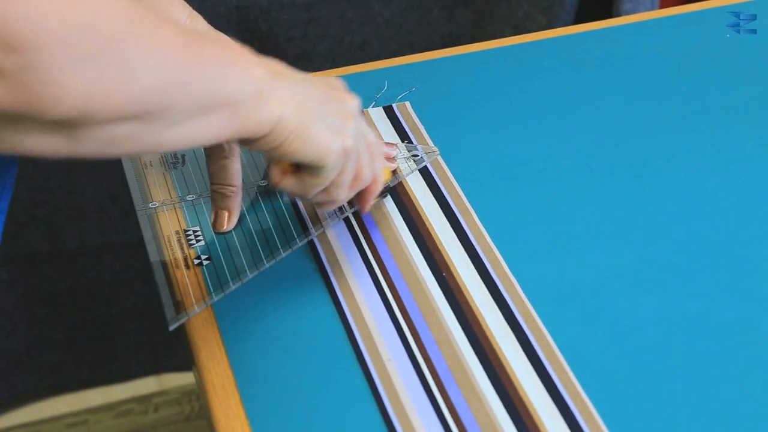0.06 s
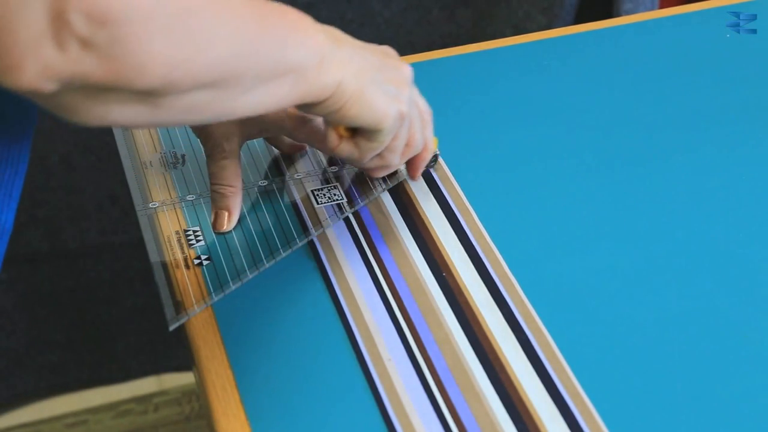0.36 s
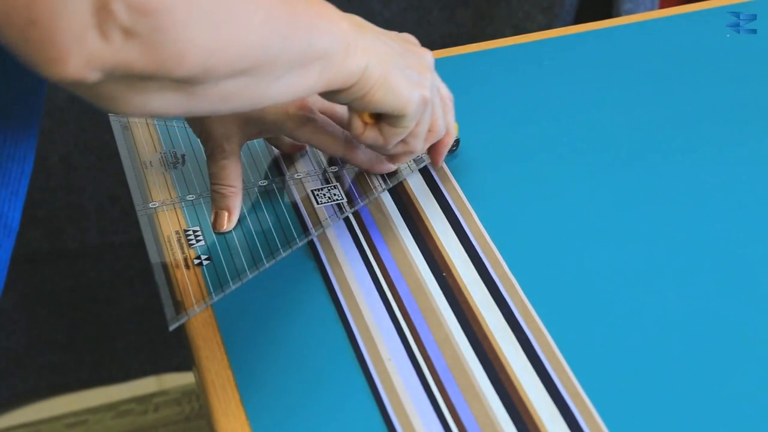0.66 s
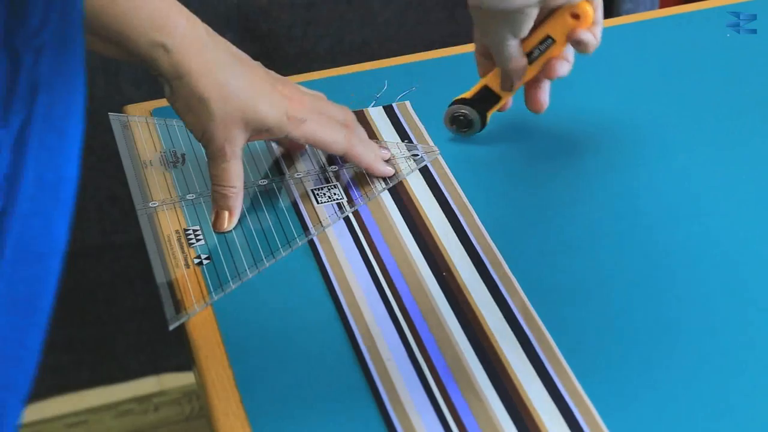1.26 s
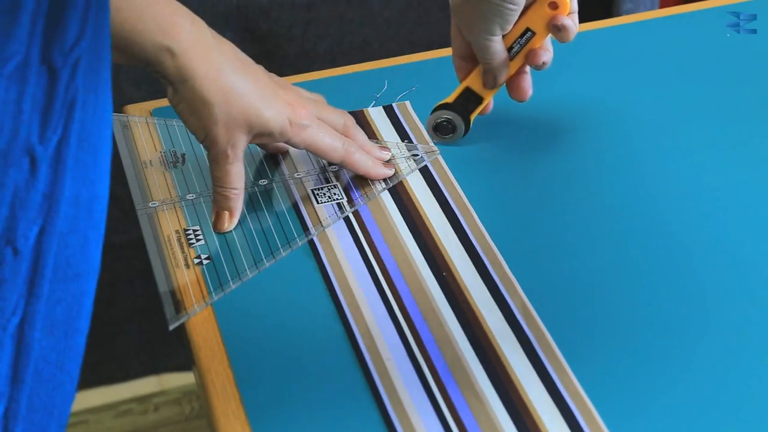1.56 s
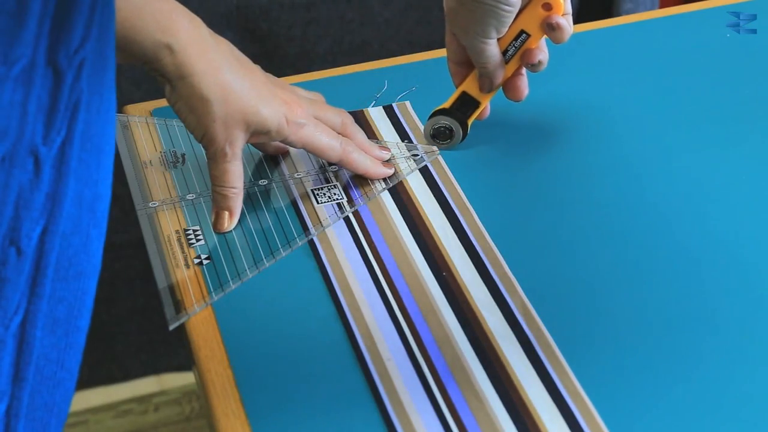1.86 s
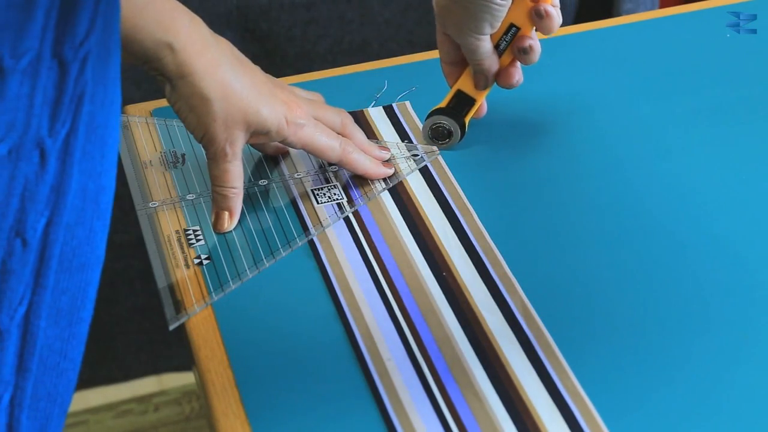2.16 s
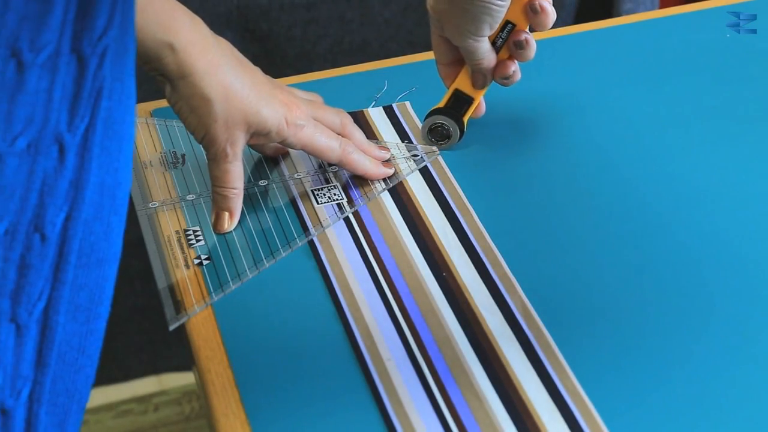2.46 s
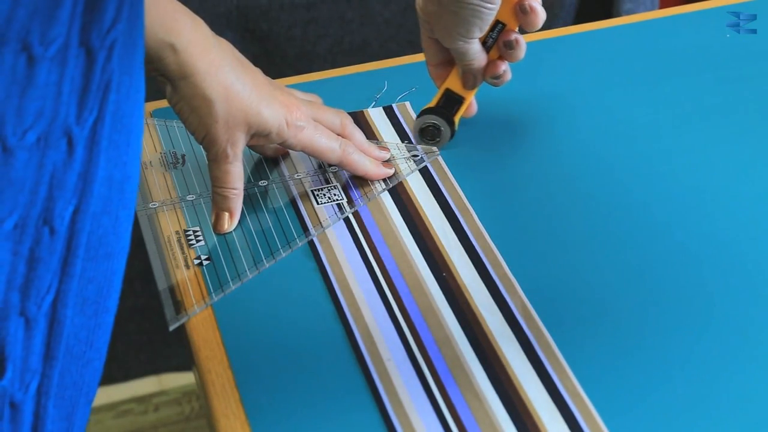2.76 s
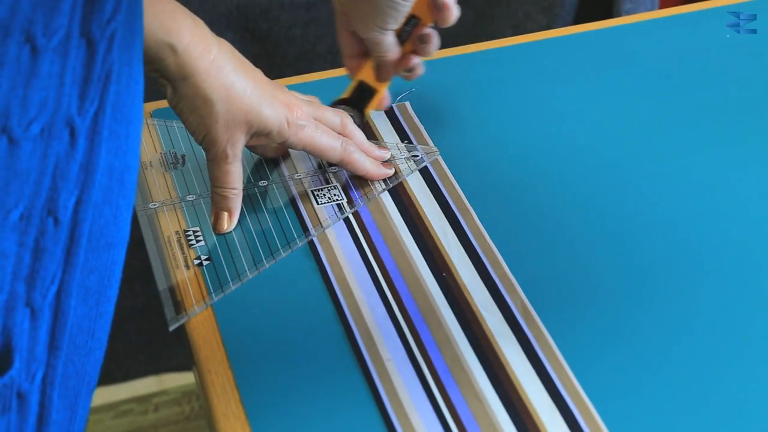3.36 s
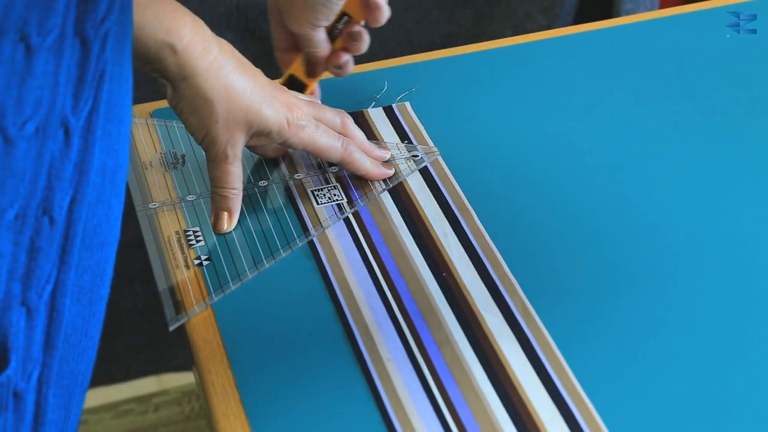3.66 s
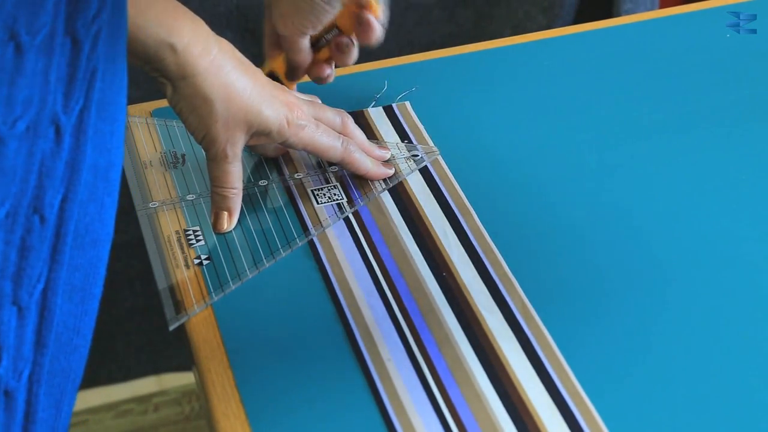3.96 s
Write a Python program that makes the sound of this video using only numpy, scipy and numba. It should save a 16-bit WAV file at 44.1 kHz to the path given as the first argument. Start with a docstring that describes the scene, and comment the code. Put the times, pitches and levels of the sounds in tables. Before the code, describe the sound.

A rotary cutter rasps briefly through folded fabric on a mat. After a soft rustle, a tap and a few clicks, it makes a longer cut with cracking threads and low table thrums, close up in a small quiet room.

```python
"""A rotary cutter rolls along a ruler, through folded fabric on a cutting mat, in a small quiet room.
Its wheel judders, snaps threads and rasps on the mat, ringing the blade, the ruler and the table top.
An arm swings back with a soft rustle, a finger taps the ruler, and the cutter clicks as it is lined up.
Then the wheel bites with a squeak and makes a second, longer stroke: the table thrums under the
leaning arm and thick threads crack. Faint hiss and a deep rumble lie under it all."""
import sys
import numpy as np
from scipy import signal
from scipy.fft import rfft, irfft
from scipy.io import wavfile
from numba import njit

SR = 44100
rng = np.random.default_rng(int(sys.argv[2]) if len(sys.argv) > 2 else 0)


def transcribe(signal):
    """Save signal, clipped to [-1, 1], as a 16-bit WAV file at the path in sys.argv[1]."""
    frames = np.atleast_2d(signal).T
    limited = np.clip(frames, -1, 1)
    pcm = np.round(limited * 32767).astype(np.int16)
    wavfile.write(sys.argv[1], SR, pcm)


N = 176400
TIME = np.arange(N) / SR
THREADS_PER_S, GRIT_PER_S = 5000, 9000


def undb(db):
    """Decibels to gain."""
    return 10 ** (np.asarray(db) / 20)


def unit(x):
    """Scale to rms 1."""
    return x / np.sqrt(np.mean(x ** 2))


def control(rows, column=1):
    """One column of a timed table at every sample."""
    rows = np.array(rows)
    return np.interp(TIME, rows[:, 0], rows[:, column])


def fader(rows):
    """Gain along (t/s, level/dB) points; silent outside them."""
    return undb(np.interp(TIME, *np.array(rows).T, left=-120, right=-120))


def wander(per_s):
    """Slow random motion with a spread near 1."""
    return np.interp(TIME * per_s, np.arange(1000), rng.standard_normal(1000))


def grains(per_s):
    """Dense clicks of either sign, a few up to 5 dB above the rest."""
    impulses = (rng.random(N) < per_s / SR) * rng.choice([-1, 1], N)
    return impulses * undb(np.minimum(rng.exponential(size=N), 5))


def colour(x, points):
    """Minimum-phase EQ through (f/Hz, level/dB) points, at rms 1."""
    hz, db = np.array(points, float).T
    gain = undb(np.interp(np.log(np.arange(N // 2 + 1) * SR / N + 1e-3), np.log(hz), db))
    cepstrum = irfft(np.log(gain), N)
    cepstrum[1:N // 2] *= 2
    cepstrum[N // 2 + 1:] = 0
    return unit(irfft(rfft(x) * np.exp(rfft(cepstrum)), N))


@njit
def resonance(x, hz, k):
    """State-variable band-pass with a moving centre; k is width over centre."""
    y, state, low = np.empty(len(x)), 0., 0.
    for i in range(len(x)):
        g = np.tan(np.pi * min(hz[i] / SR, .45))
        v = (state + g * (x[i] + 1e-18 - low)) / (1 + g * (g + k))
        state, low, y[i] = 2 * v - state, low + 2 * g * v, k * v
    return y


def band(x, hz, width, shift=1):
    """One resonance, gain 1 at hz times shift."""
    return resonance(x, np.ones(N) * hz * shift, float(width / hz))


def ring(x, modes, shift=1):
    """Steep-sided modes driven by x, in alternating polarity, at rms 1."""
    body = 0
    for k, (hz, width, db) in enumerate(modes):
        broad = 1.62 * width  # two passes narrow it again
        body += (-1) ** k * undb(db) * band(band(x, hz, broad, shift), hz, broad, shift)
    return unit(body)


def struck(at, modes):
    """Modes that ring out after one blow, at peak 1."""
    age = np.maximum(TIME - at, 0)
    body = sum(undb(db) * np.sin(2 * np.pi * hz * age) * np.exp(-np.pi * width * age)
               for hz, width, db in modes)
    return body / abs(body).max()


def judder(per_s=170, jitter=.45, scatter_db=1.5, decay_s=0.0048, drag=0.93):
    """The wheel catches and slips unevenly; each slip is a short surge over a steady drag."""
    gap, size = rng.standard_normal((N // 50, 2)).T
    at = (np.cumsum(np.exp(jitter * gap)) / per_s * SR).astype(int)
    slips = np.bincount(at[at < N], undb(scatter_db * size)[at < N], N)
    return unit(drag + signal.lfilter([1], [1, -np.exp(-1 / (decay_s * SR))], slips))


# the blade's two rings glide and flare as it leans on the ruler: t/s, f/Hz, level/dB against the rasp
BLADE_LOW = [(0, 6700, -24), (.13, 6800, -14), (.21, 6400, -16), (.28, 6600, -16), (.37, 7100, -16),
             (.5, 7100, -13.5), (.65, 6800, -20), (2.7, 6660, -9), (2.88, 6800, -26), (3.0, 6770, -11),
             (3.1, 6900, -15), (3.32, 6640, -25), (3.45, 7240, -13), (3.56, 8200, -20), (3.66, 7250, -33),
             (3.8, 7160, -24)]
BLADE_HIGH = [(0, 8950, -10), (.21, 9100, -10), (.33, 8800, -15), (.5, 8900, -15), (.65, 8600, -30),
              (2.75, 8700, -17), (2.87, 8760, -15), (3.0, 8900, -12.5), (3.13, 8560, -15.5),
              (3.25, 8700, -7.5), (3.33, 8900, -8.5), (3.42, 8600, -7.5), (3.52, 8650, -10),
              (3.63, 9040, -12.5), (3.8, 8800, -17.5)]
def blade(scrape, curve, relative_width):
    """Scraping excites one gliding ring of the blade."""
    hz = control(curve)
    tone = resonance(resonance(scrape, hz, relative_width), hz, relative_width)
    return undb(control(curve, column=2)) * unit(tone)


# depth in the cloth, the crossfade from mat to threads: t/s, thread share/0-1
IN_CLOTH = [(0, 1), (.22, 0.82), (.3, 0.82), (.41, 0.75), (.48, 0.27), (2.78, 0.15), (2.85, 0.34),
            (2.9, 0.33), (2.99, 0.5), (3.07, 0.5), (3.16, 0.75), (3.38, 0.6), (3.44, 1), (3.62, 0.72),
            (3.68, 0.45)]
# EQ of snapping threads: f/Hz, level/dB
THREAD_EQ = [(100, -30), (240, -13), (330, -8.5), (420, -13.5), (600, -2), (1000, -5.5), (1200, -4.5),
             (1800, -0.5), (2600, 0), (3800, -6), (4600, -6.5), (6000, -12), (7000, -12.5), (7800, -14),
             (10300, -10.5), (12300, -15), (14200, -13), (16000, -19)]
# the hollow between hand, ruler and mat changes size as the wheel travels: t/s, pitch factor
HOLLOW_SHIFT = [(0, 1.06), (.22, 1.17), (.36, 1.03), (.5, 1.06), (.68, 0.97), (2.7, 0.97), (2.8, .93),
                (2.92, 0.97), (3.12, 1.01), (3.42, 0.96), (3.57, 1.02), (3.68, 1.01), (3.8, 1.025)]
# its resonances at factor 1: f/Hz, width/Hz, level/dB
HOLLOW_MODES = [(1012, 240, -5), (1620, 300, -5), (2074, 310, 3.5), (2440, 330, -1), (2760, 330, -5),
                (4030, 770, -6), (4650, 360, -3.5), (5184, 330, -3), (7320, 510, -18), (13700, 4100, -26)]
# pitches that cancel in it at factor 1: f/Hz, width/Hz
HOLLOW_NOTCHES = [(1280, 18), (3430, 205), (6120, 220), (7900, 100), (9850, 290)]
def wheel_rasp(surge, grit, snaps, wobble_per_s=17, flicker_db=3):
    """Threads snap, grit rings the hollow under the hand and the blade sings along; at rms 1."""
    cloth = control(IN_CLOTH)
    shift = control(HOLLOW_SHIFT) * (1 + 0.0075 * wander(wobble_per_s))  # the hand is never quite steady
    rasp = np.sqrt(cloth) * colour(snaps, THREAD_EQ)
    rasp += np.sqrt(1 - cloth) * ring(grit, HOLLOW_MODES, shift)
    treble = band(rasp, hz=11400, width=1900, shift=1 + 0.058 * wander(wobble_per_s))
    rasp += (undb(flicker_db * wander(wobble_per_s)) - 1) * treble  # the treble flickers
    scrape = surge * grains(THREADS_PER_S)
    rasp += blade(scrape, BLADE_LOW, 0.11) + blade(scrape, BLADE_HIGH, 0.1)
    for hz, width in HOLLOW_NOTCHES * 2:  # twice for a deep dip; cloth damps the hollow and fills it in
        rasp -= (1 - cloth) * band(rasp, hz, width, shift)
    return unit(rasp)


# modes of the acrylic ruler: f/Hz, width/Hz, level/dB
RULER_MODES = [(1240, 10.3, 2), (1421, 25, 2), (1538, 22, 1), (1593, 17.7, 6), (1833, 41, 1),
               (1995, 8.3, -10), (2056, 29, 5), (2247, 79, -11), (2423, 6.6, -18), (2580, 30, -3),
               (2748, 31, 0), (3190, 24, -21)]
# how strongly it rings: t/s, level/dB against the rasp
RULER_CONTACT = [(0, -12), (.65, -11), (2.7, -8), (3.35, -7.5), (3.52, -5.5), (3.8, -3)]
def ruler(surge):
    """The wheel rubs the ruler's edge and makes it ring."""
    return undb(control(RULER_CONTACT)) * ring(surge * grains(GRIT_PER_S), RULER_MODES)


def pressure(curve, column, landing_s=.05, lift_s=.005):
    """Gain of one stroke: it creeps in as the wheel lands and dies as it lifts."""
    early = np.maximum(curve[0][0] - TIME, 0)
    late = np.maximum(TIME - curve[-1][0], 0)
    return undb(control(curve, column)) * np.exp(-early / landing_s - late / lift_s)


# modes of table top and mat: f/Hz, width/Hz, level/dB
TABLE_MODES = [(532, 25.6, -2.5), (595.3, 25, 2), (687, 49, -10.5), (719, 51, 3), (763.5, 28, -6.5),
               (832, 16.7, 1.5), (933, 35, -10.5), (988, 32, -10), (1046, 58, -18)]
# fader rides of the two strokes, before the trims: t/s, rasp level/dB, table top level/dB
FIRST_STROKE = [(0.0, -34, -36.5), (0.056, -32, -41), (0.132, -35, -39.5), (0.21, -34.5, -45),
                (0.23, -36.5, -38.5), (0.306, -37, -45.5), (0.378, -36, -43.5), (0.482, -44, -49.5),
                (0.56, -41.5, -50.5), (0.648, -42.5, -49.5), (0.662, -47, -51)]
SECOND_STROKE = [(2.68, -62.5, -70), (2.762, -54.5, -56), (2.815, -50, -55), (2.85, -42, -45.5),
                 (2.885, -48, -49.5), (2.985, -37.5, -44), (3.075, -44, -49), (3.1, -38.5, -43),
                 (3.26, -38, -42), (3.38, -39, -47), (3.47, -32, -41.5), (3.53, -34.5, -44),
                 (3.575, -35, -44.5), (3.618, -33.5, -46), (3.678, -44.5, -51.5), (3.72, -40.5, -58),
                 (3.79, -43.5, -52), (3.812, -41.5, -51.5)]
def stroke(curve, rasp_trim_db=-1, table_trim_db=0.2):
    """One pass: the judder drives grit and thread snaps, which rasp and shake the table top."""
    surge = judder()
    grit = surge * grains(GRIT_PER_S)
    snaps = abs(surge) ** 0.48 * grains(THREADS_PER_S)
    rasp = pressure(curve, column=1) * (wheel_rasp(surge, grit, snaps) + ruler(surge))
    table_top = pressure(curve, column=2) * ring(grit + snaps, TABLE_MODES)
    return undb(rasp_trim_db) * rasp + undb(table_trim_db) * table_top


def wide_noise(eq, spread):
    """Coloured noise that is partly different left and right."""
    mid, side = (colour(rng.standard_normal(N), eq) for _ in range(2))
    return mid + spread * side * np.array([[1], [-1]])


# EQs of the room's hiss and rumble: f/Hz, level/dB
HISS_EQ = [(71, -19.5), (120, -3), (339, -7.5), (509, -12), (586, -12.5), (2390, -20.5), (5170, -24),
           (6730, -25), (9320, -25.5), (15500, -30)]
RUMBLE_EQ = [(5, -5.5), (14, -6.5), (28, -9.5), (50, -16), (75, -23.5), (120, -27), (200, -41),
             (500, -78.5)]
def room_tone():
    """Faint hiss and a deep rumble that comes in swells, stronger on the left."""
    swell = unit(undb(8 * np.tanh(wander(per_s=23))))
    hiss = undb(-65) * wide_noise(HISS_EQ, spread=0.91)
    rumble = undb(-50.5) * swell * wide_noise(RUMBLE_EQ, spread=0.76)
    return hiss + rumble * undb([[2], [-2]])


# fader ride of the arm's swing: t/s, level/dB
RUSTLE_FADER = [(.8, -74), (1.05, -68), (1.22, -67), (1.32, -65.5), (1.5, -74.5)]
# EQ of the rustle: f/Hz, level/dB
RUSTLE_EQ = [(200, -17), (600, -9.5), (3300, -11), (8000, -11), (16000, -15)]
def arm_rustle():
    """The arm swings back with a soft, grainy rustle."""
    return fader(RUSTLE_FADER) * colour(grains(THREADS_PER_S), RUSTLE_EQ)


# modes of the tapped ruler: f/Hz, width/Hz, level/dB
TAP_MODES = [(600, 50, -0.5), (1860, 90, -4), (2024, 60, -4), (3900, 97, 0), (4231, 110, -7)]
def finger_tap():
    """A finger settles on the ruler and rings it briefly."""
    return undb(-48) * struck(at=1.154, modes=TAP_MODES)


# cues: t/s, tick level/dB, plastic level/dB, handle knock level/dB, tick f/Hz, tick width/Hz
CLICKS = [(1.826, -32.5, -40.5, -52.5, 6750, 2400), (2.091, -48, -75, -87, 13000, 6000),
          (2.122, -46, -75, -85, 12300, 6000)]
# modes of the cutter's plastic body: f/Hz, width/Hz, level/dB
PLASTIC_MODES = [(2140, 120, -9), (3220, 240, 3), (3900, 120, -10), (4300, 58, -5), (5900, 120, -4),
                 (6450, 160, -7), (8230, 91, 3)]
def cutter_clicks(knock_hz=335, knock_s=0.02):
    """Sharp ticks ring the plastic body, each with a small hollow knock of the handle."""
    out = np.zeros(N)
    for at, tick_db, ring_db, knock_db, hz, width in CLICKS:
        age = np.maximum(TIME - at, 0)
        tick = band(band(signal.unit_impulse(N, int(at * SR)), hz, width), hz, width)
        knock = np.sin(2 * np.pi * knock_hz * age) * np.exp(-age / knock_s)
        out += undb(tick_db) * tick / abs(tick).max()
        out += undb(ring_db) * struck(at, PLASTIC_MODES) + undb(knock_db) * knock
    return out


# fader ride of the wheel's bite: t/s, level/dB
BITE_FADER = [(2.65, -90), (2.675, -56), (2.71, -62), (2.74, -58), (2.82, -54), (2.87, -70)]
# its squeak and fizz bands: f/Hz, width/Hz, level/dB
BITE_MODES = [(2043, 110, 1), (4770, 320, -12.5), (12800, 4900, -21.5)]
def wheel_bite():
    """The wheel squeaks and fizzes as it bites the mat for the second stroke."""
    return fader(BITE_FADER) * ring(grains(GRIT_PER_S), BITE_MODES)


# fader ride of the thrum: t/s, level/dB
THRUM_FADER = [(2.7, -76), (3.22, -68), (3.33, -49.5), (3.37, -76), (3.43, -47.5), (3.49, -62),
               (3.65, -52.5), (3.8, -61), (3.9, -74)]
# bass modes of the table: f/Hz, width/Hz, level/dB
THRUM_MODES = [(115.7, 11.5, 6.5), (150.4, 10.4, 2.5)]
def table_thrum():
    """The table thrums under the leaning arm."""
    return fader(THRUM_FADER) * ring(rng.standard_normal(N), THRUM_MODES)


# cues of thick threads: t/s, peak level/dB before the trim
CRACKS = [(2.818, -30), (2.9108, -24), (2.9756, -31), (3.096, -36), (3.4593, -9), (3.5204, -27),
          (3.6073, -19)]
def thread_cracks(trim_db=-10):
    """Thick threads give way in single cracks, coloured like the other threads."""
    snap = colour(signal.unit_impulse(N), THREAD_EQ)
    at, db = np.array(CRACKS).T
    hits = np.bincount((at * SR).astype(int), undb(db + trim_db), N)
    return signal.fftconvolve(hits, snap / abs(snap).max())[:N]


def room_reverb(send, t60_s=0.19, predelay_s=0.0036, spread=0.64, wider_above_hz=2200):
    """Short diffuse stereo tail, a little wider in the treble."""
    t = np.arange(SR // 2) / SR
    mid, side = rng.standard_normal((2, len(t))) * undb(-60 * t / t60_s) * (t > predelay_s)
    low_side = signal.lfilter(*signal.butter(1, wider_above_hz, fs=SR), side)
    side = spread * (side - 0.11 * low_side)
    tails = (mid + side, mid - side)
    return np.array([signal.fftconvolve(send, tail / np.linalg.norm(tail))[:N] for tail in tails])


def scene(left_delay_s=.000028):
    """All at the table, slightly to the right; tap and clicks get less reverb."""
    cuts = wheel_bite() + stroke(FIRST_STROKE) + stroke(SECOND_STROKE) + thread_cracks()
    arm = table_thrum() + arm_rustle()
    ticks = finger_tap() + cutter_clicks()
    right = cuts + arm + ticks
    hz = np.arange(N // 2 + 1) * SR / N
    left = irfft(rfft(right) * np.exp(-2j * np.pi * hz * left_delay_s), N)
    send = undb(-4.5) * (cuts + arm) + undb(-9) * ticks
    return np.array([left, right]) + room_reverb(send) + room_tone()


def record(dry):
    """A steep low-pass cuts the top above 15.8 kHz."""
    return signal.sosfilt(signal.ellip(10, .2, 70, 15800, fs=SR, output="sos"), dry)


dry = scene()
out = record(dry)
transcribe(out)
```